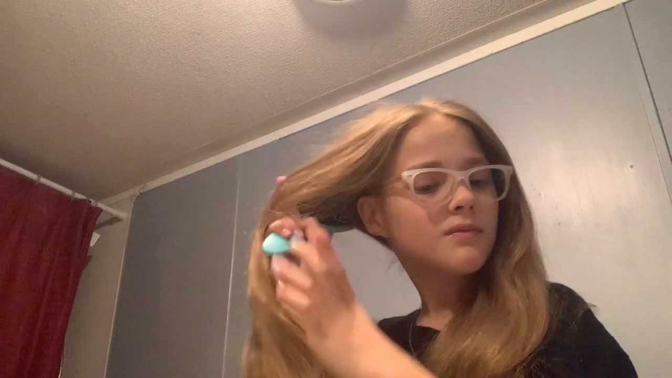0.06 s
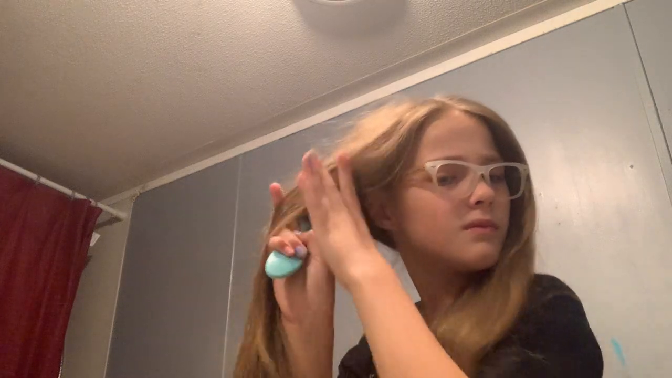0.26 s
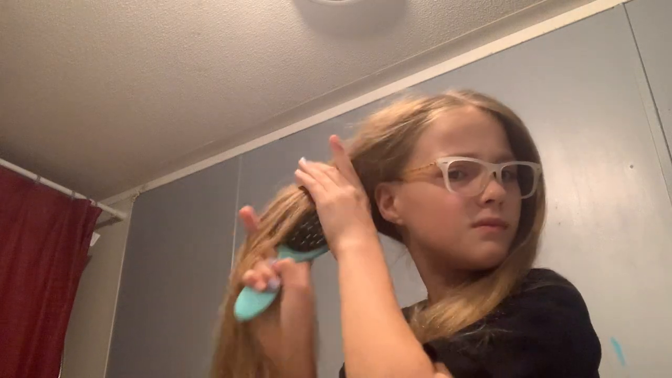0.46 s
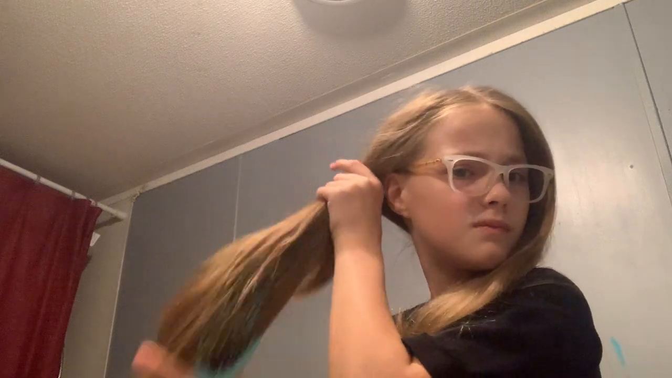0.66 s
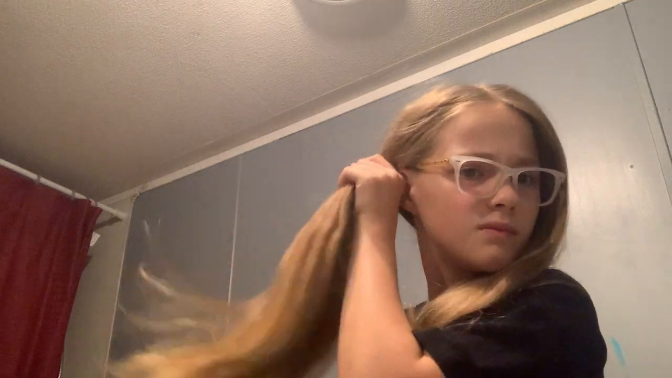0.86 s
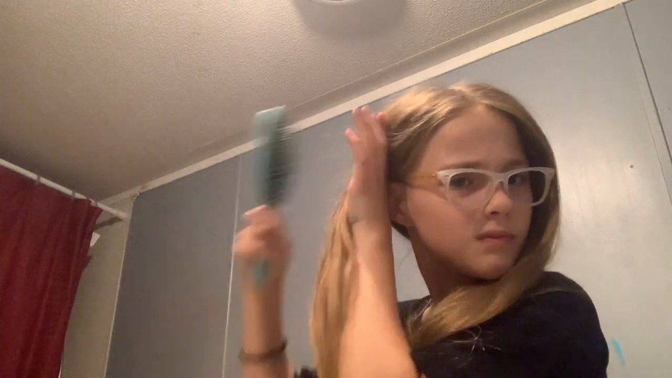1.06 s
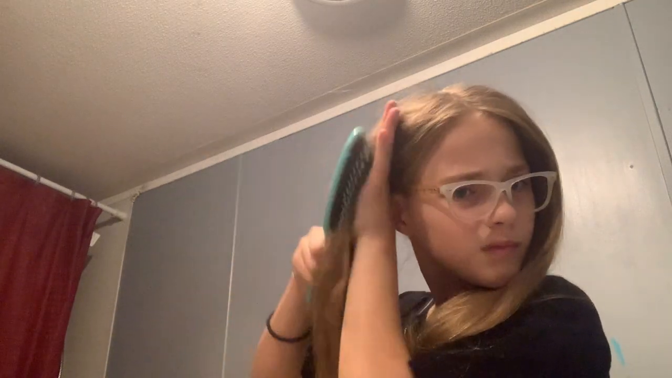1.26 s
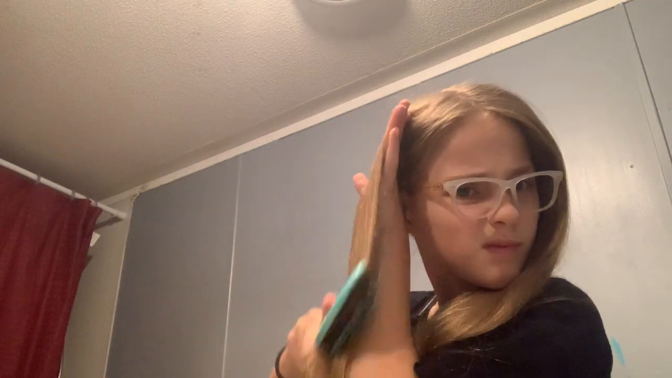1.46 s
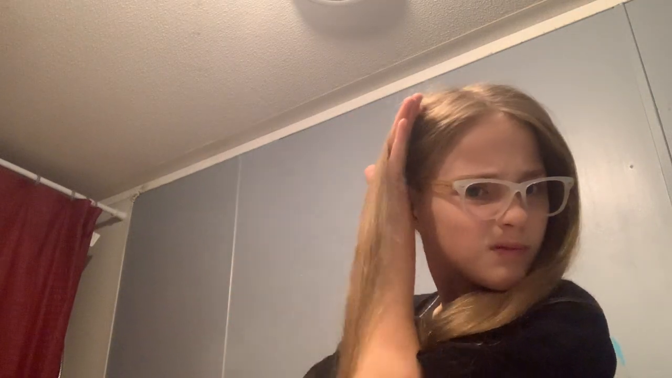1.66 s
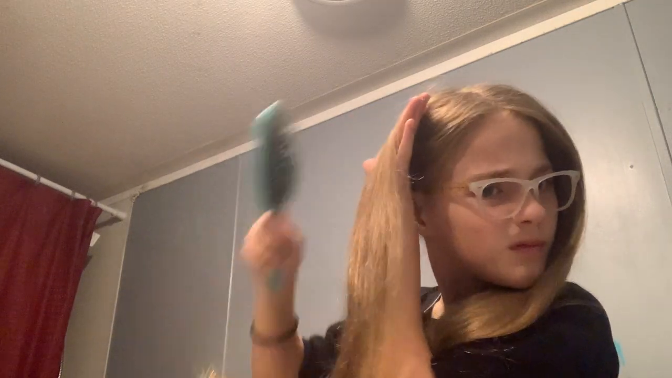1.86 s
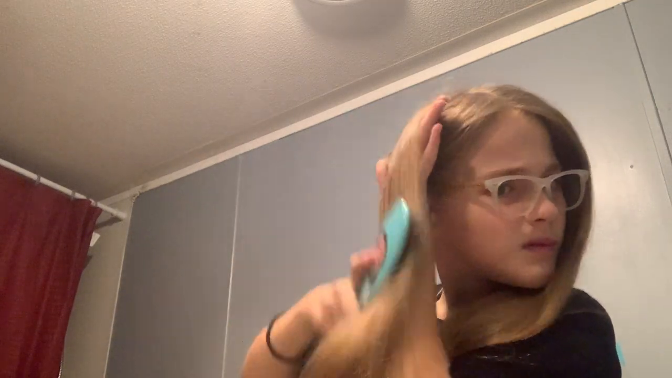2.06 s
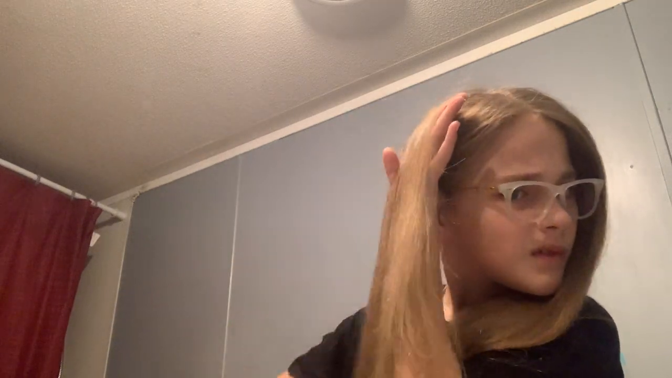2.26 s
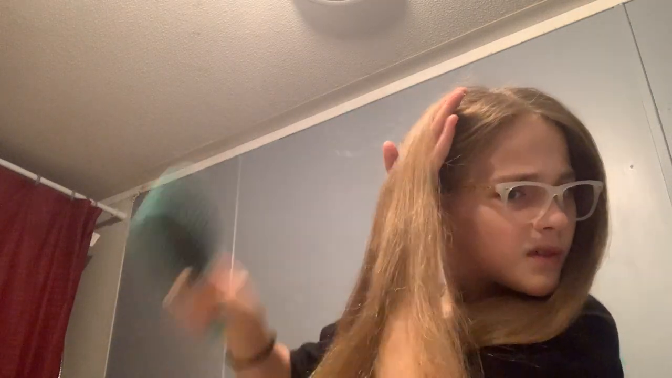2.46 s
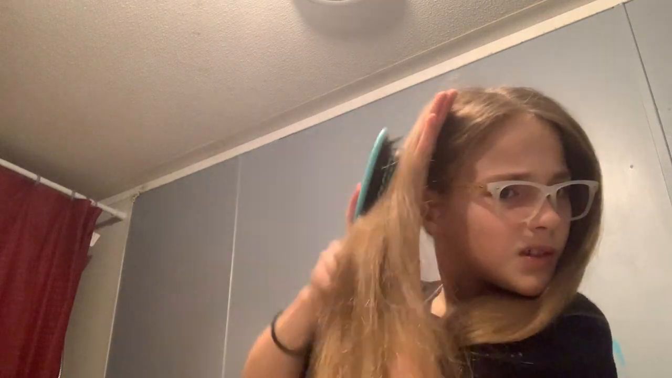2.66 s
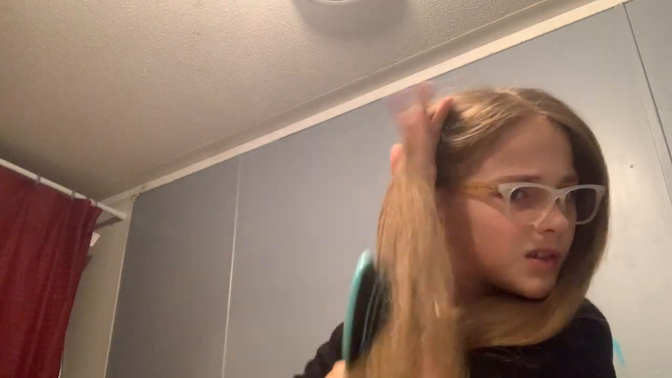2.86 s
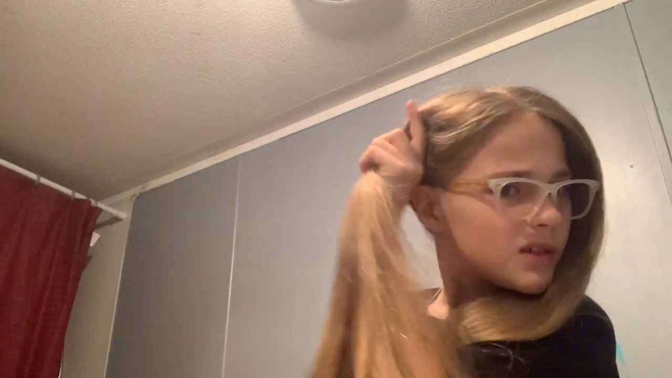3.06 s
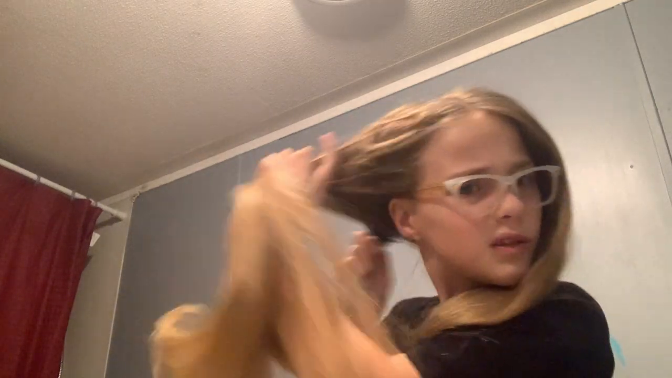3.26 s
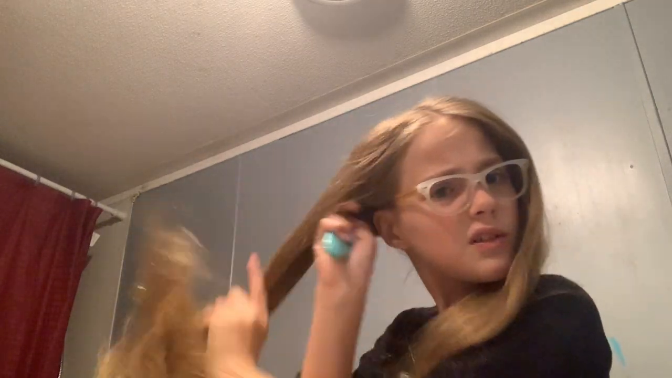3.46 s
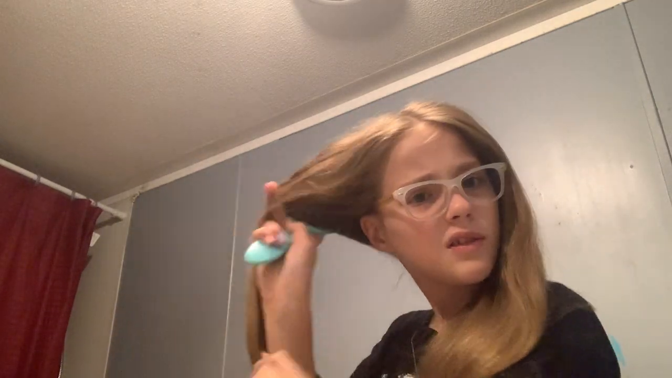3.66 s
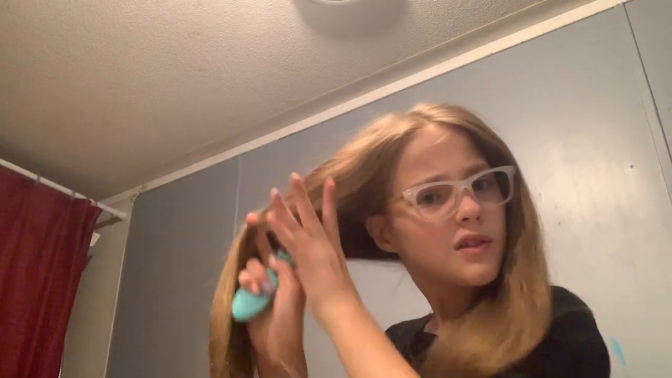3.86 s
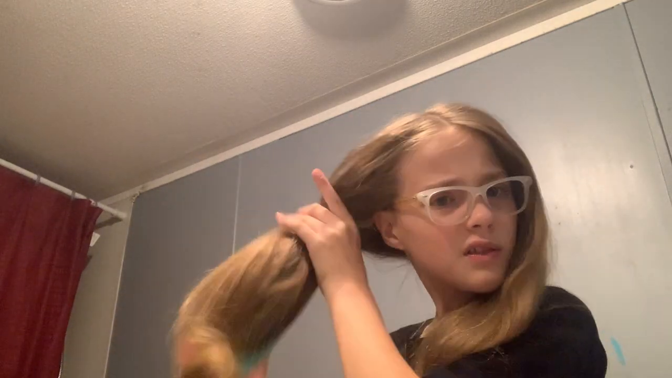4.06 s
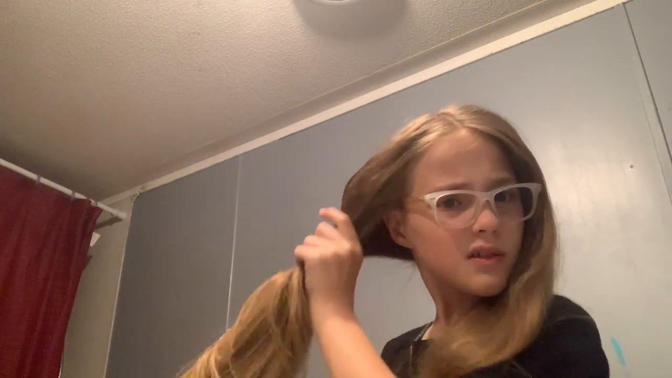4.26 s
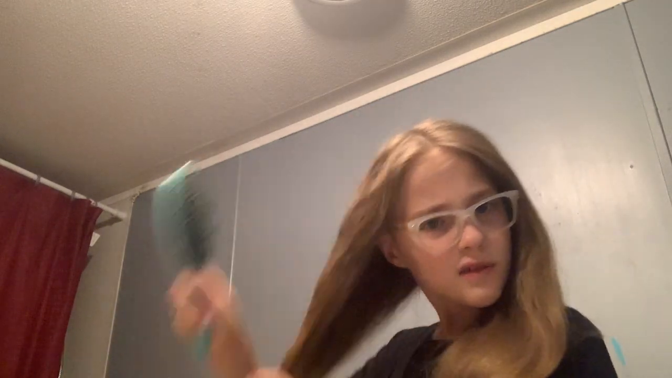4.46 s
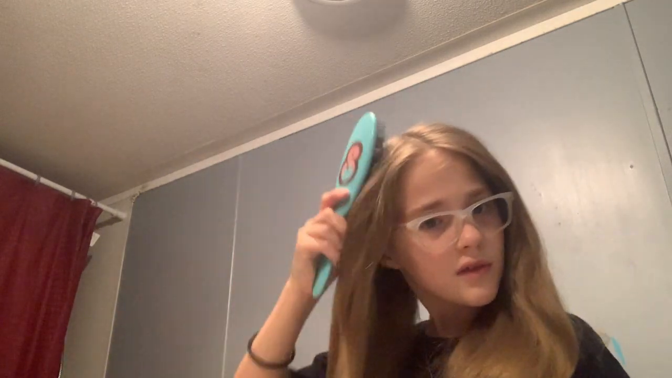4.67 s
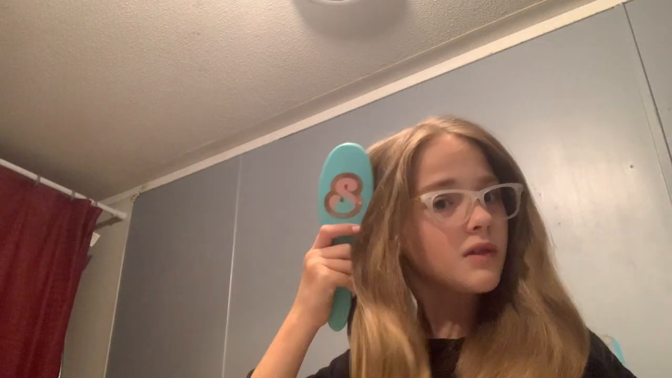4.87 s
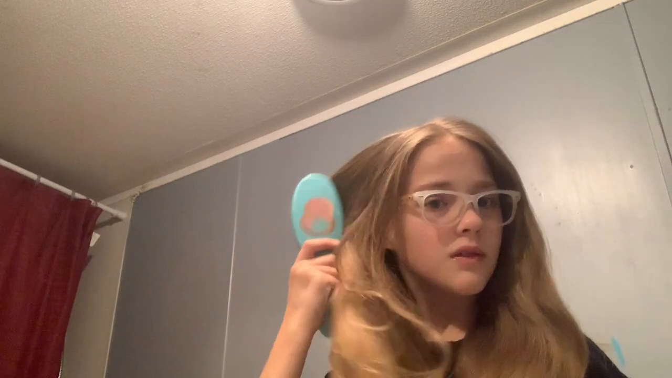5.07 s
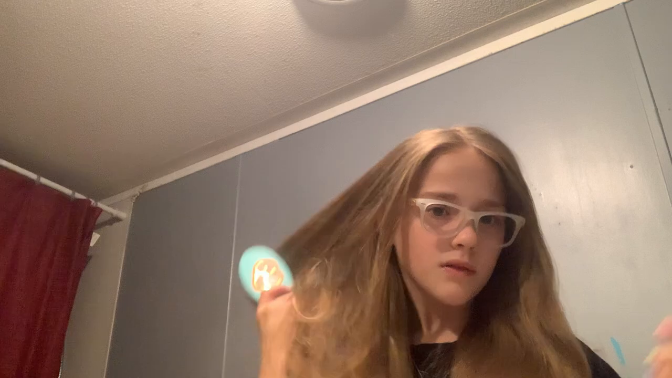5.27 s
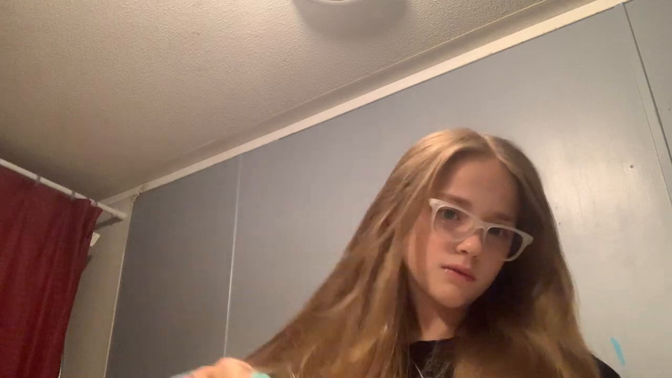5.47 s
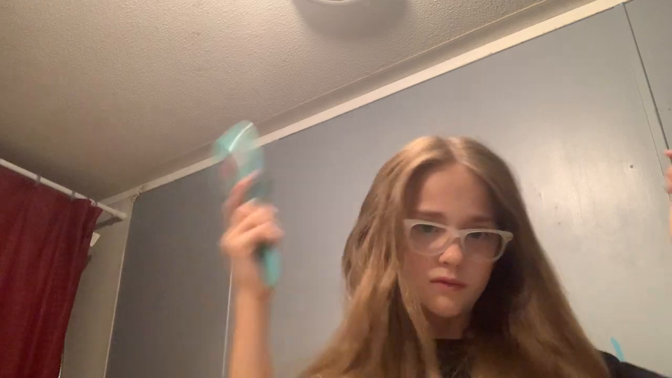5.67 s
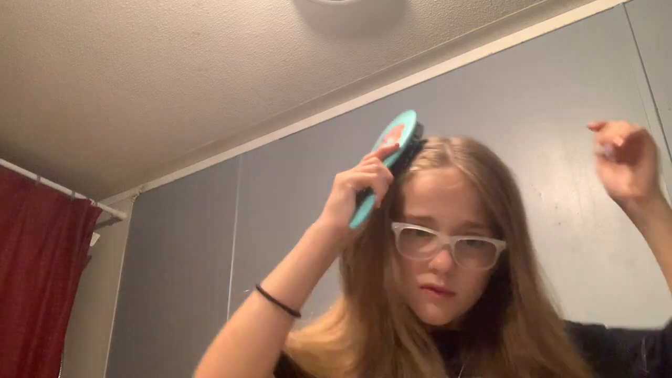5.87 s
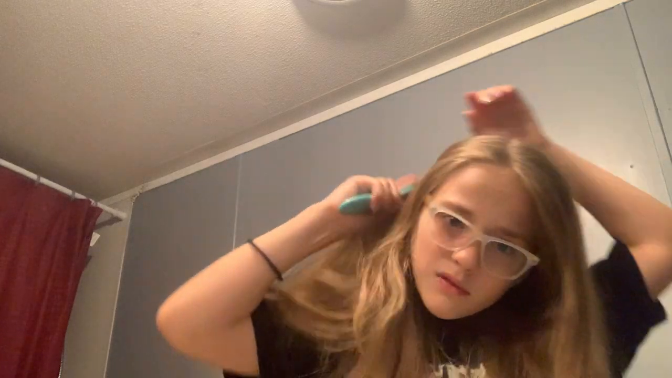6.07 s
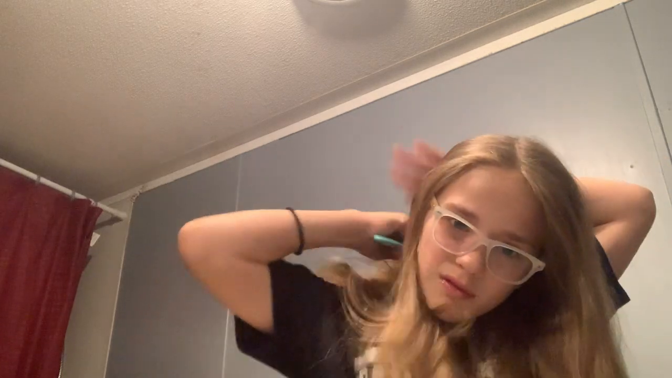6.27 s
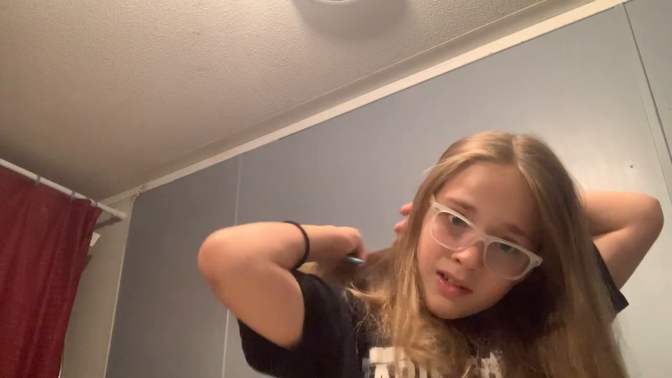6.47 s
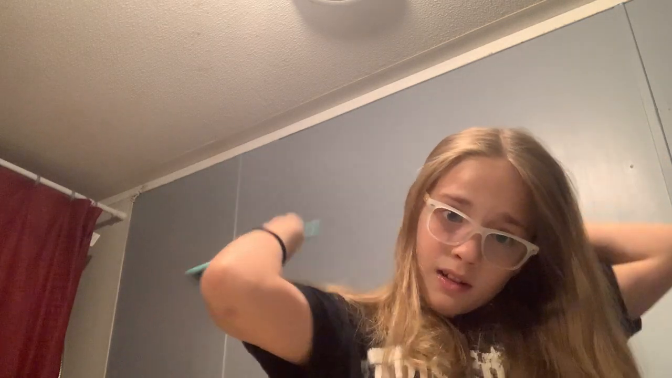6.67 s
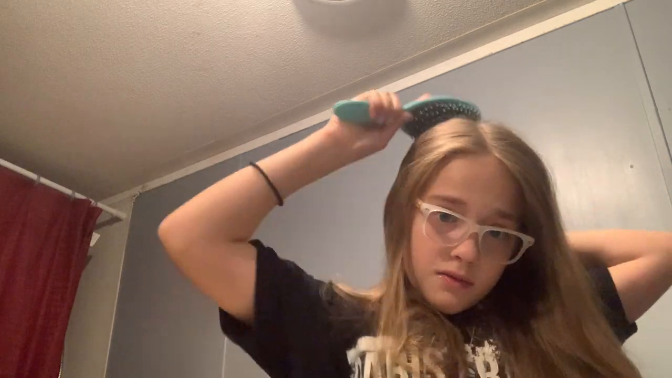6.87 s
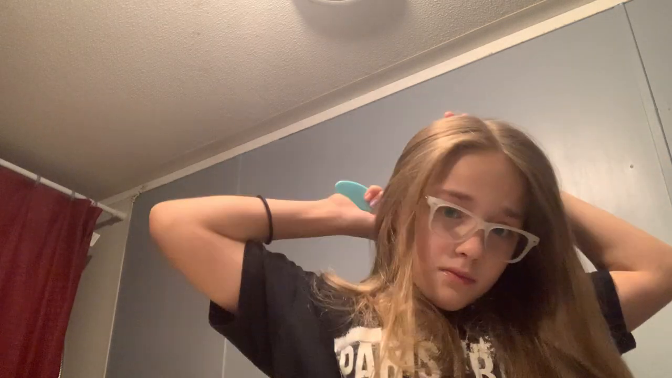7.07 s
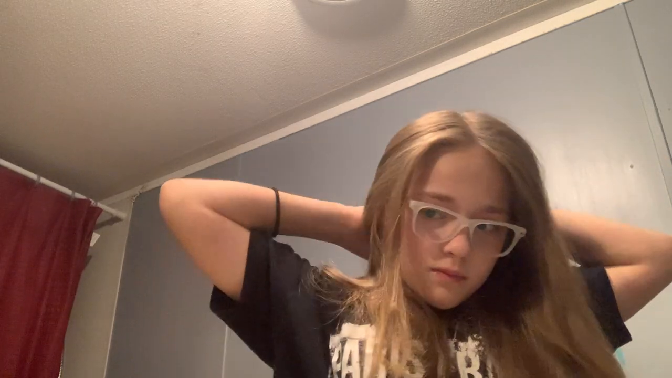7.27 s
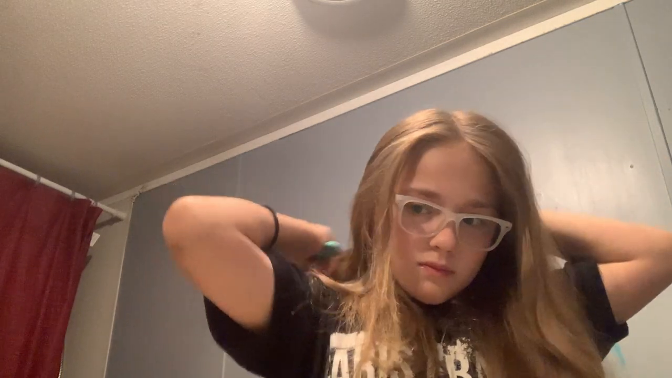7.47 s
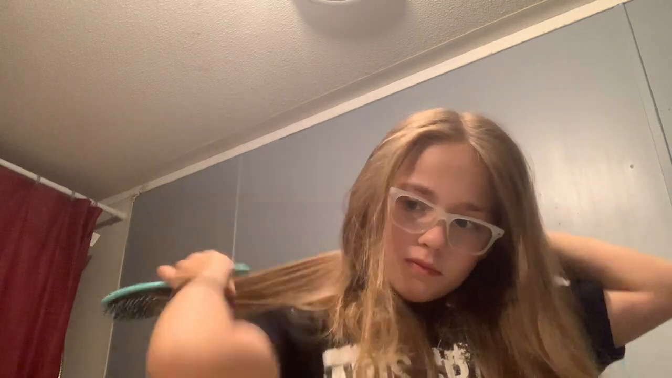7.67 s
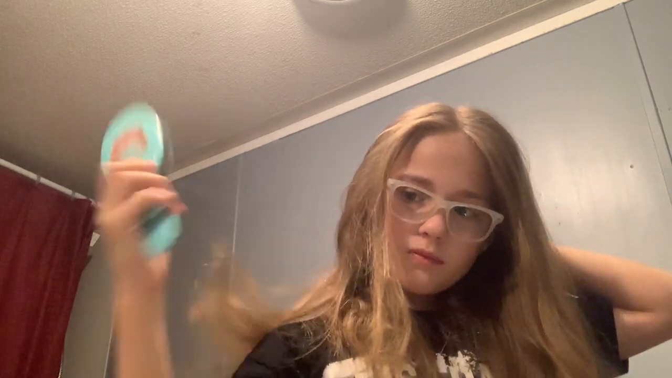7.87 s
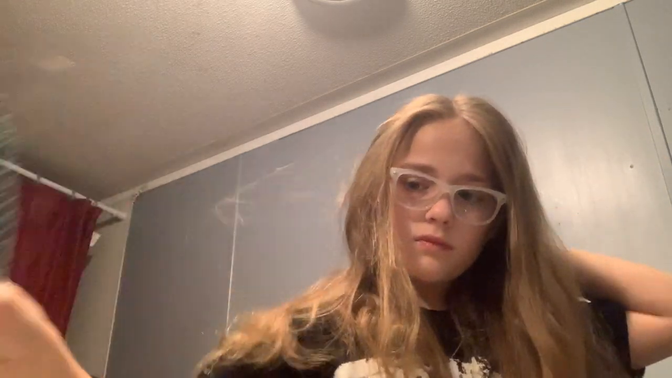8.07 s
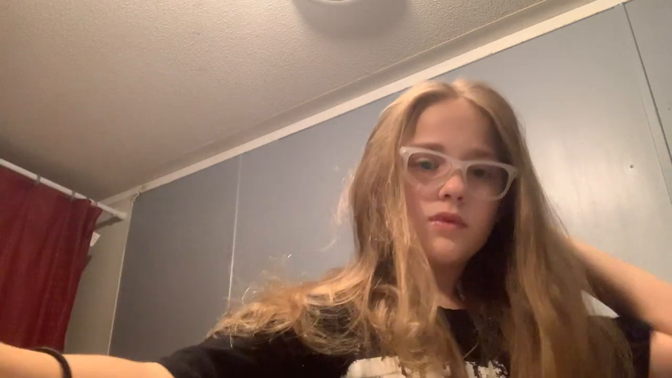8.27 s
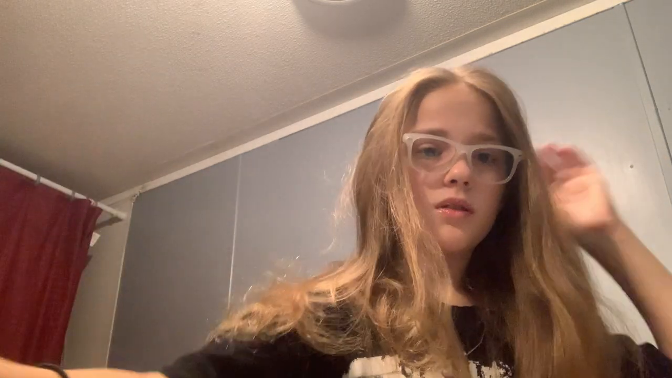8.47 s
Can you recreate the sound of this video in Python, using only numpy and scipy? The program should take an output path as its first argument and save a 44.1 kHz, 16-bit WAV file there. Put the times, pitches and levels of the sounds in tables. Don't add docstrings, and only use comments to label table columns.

```python
import sys
import numpy as np
from scipy import signal
from scipy.fft import rfft, irfft, next_fast_len
from scipy.io import wavfile
from scipy.ndimage import uniform_filter1d, map_coordinates

SR = 44100
rng = np.random.default_rng(int(sys.argv[2]) if len(sys.argv) > 2 else 0)


def store_pcm(level_fs):
    pcm = np.round(np.clip(level_fs, -1, 1) * 32767).astype(np.int16)
    wavfile.write(sys.argv[1], SR, np.atleast_2d(pcm).T)


def linear_from_db(decibels):
    return 10 ** (np.asarray(decibels, float) / 20)


N = 375732


# frequency in Hz, level in dB.
HISS_COLOUR = [(4000, -97), (6000, -20), (7200, -2.5), (9700, 4.5), (11000, 2), (12500, 4), (15000, 5),
               (15800, -3)]
SWISH_COLOUR = [(1500, -92), (2500, -8.5), (3400, 4.5), (5000, 0), (6600, -4), (8000, -15), (11000, -90)]
RASP_COLOUR = [(600, -98), (1100, -25.5), (1500, 9.5), (2400, 6), (3200, -8), (4000, -31), (7000, -93)]
BODY_COLOUR = [(350, -89), (600, -13), (780, 2.5), (950, -0.5), (1250, 0.5), (1600, -38), (3000, -91)]


def brush():
    power = strokes()
    add_snags(power)
    add_bumps(power)
    flutter_db = 0.27 * wobble(14) + 0.66 * wobble(45)
    hairs = slips(spread_db=3.0, patchy_db=1.5) * linear_from_db(flutter_db)
    colours = (HISS_COLOUR, SWISH_COLOUR, RASP_COLOUR, BODY_COLOUR)
    layers = [coloured(hairs, colour) for colour in colours]
    return np.sum(np.sqrt(power) * layers, axis=0)


# start in seconds, swell in seconds,
# hold in seconds, speed as hiss level in dB, pressure on the scalp in dB.
STROKES = [(0.469, 0.11, .26, -54.5, -6), (1.252, .03, 0.27, -59, -4), (1.396, 0.022, 0.24, -59.5, -2),
           (2.059, .03, .05, -60, -0.5), (2.12, 0.11, .11, -61, 2), (2.44, 0.098, 0.13, -64.5, -0.5),
           (2.783, .015, .09, -59.5, 3.5), (2.88, .08, 0.096, -61, -0.5), (3.31, 0.023, 0.037, -67, -1.5),
           (3.46, 0.063, 0.21, -65.5, -3.5), (3.94, .14, 0.21, -58, -6), (4.736, .04, 0.024, -59, -2.5),
           (4.846, .11, .47, -65, -1), (5.885, .03, .06, -59.5, -1.5), (5.968, 0.085, 0.13, -57.5, -2.5),
           (6.25, .15, 0.21, -67, 2), (6.876, 0.023, 0.016, -67, 4.5), (6.965, 0.074, 0.032, -63, 3),
           (7.327, 0.1, 0.25, -69, -1)]
GRAZES = [(0.0, 0.016, 0.44, -69, -3.5), (1.172, .04, 0.086, -71.5, 3.5), (1.99, .02, .08, -68, 3),
          (2.36, .03, 0.13, -74, 4), (2.668, 0.015, .04, -78, 9), (3.38, .03, 0.11, -77, 6.5),
          (3.745, 0.036, 0.39, -70, -6.5), (4.45, .1, 0.2, -81.5, 11), (4.82, .02, 0.13, -73.5, 0),
          (6.2, .03, .14, -70.5, 0), (7.148, .06, .06, -73.5, 3), (7.95, 0.078, 0.11, -82, 3)]
# level over the stroke in dB,
# dB gained per dB of pressure, and level of loose hair and cloth between strokes in dB.
LAYER_DB = [1.5, 0, -1, 5.5]
PRESSURE_GAIN = [0, 1, 1, 1]
REST_DB = [-87.5, -82, -62, -65.5]


def strokes():
    swell_db, lift_db_per_s = 14, 263
    t = np.arange(N) / SR
    power = linear_from_db(REST_DB)[:, None] ** 2 * np.ones(N)
    for s, swell, hold, speed_db, press_db in STROKES + GRAZES:
        span = slice(round(s * SR), round((s + swell + hold) * SR) + SR // 4)
        since = t[span] - s - swell
        rise_db = swell_db * since / max(swell, .005)
        fall_db = lift_db_per_s * (hold - since)
        shape_db = np.minimum(0, np.minimum(rise_db, fall_db))
        layer_db = speed_db + np.array(LAYER_DB) + press_db * np.array(PRESSURE_GAIN)
        power[:, span] += linear_from_db(layer_db[:, None] + shape_db) ** 2
    return power


# start in seconds, peak in dB, treble in dB, t60 in seconds.
SNAGS = [(0.8194, -49.5, -2.5, 0.042), (1.1964, -52.5, -6, 0.045), (1.2844, -47, 1, 0.041),
         (1.459, -40, -4.5, 0.065), (1.543, -49.5, -4, .03), (1.624, -44, -6, 0.027),
         (1.5994, -50.5, -4.5, 0.046), (1.9993, -48, -2, 0.041), (2.0796, -45, -0.5, 0.043),
         (2.6458, -40.5, -3.5, 0.049), (2.7997, -43.5, -18.5, 0.041), (2.8594, -43.5, 0.5, 0.039),
         (3.3303, -42.5, 1, 0.035), (3.3594, -56, -9, 0.031), (3.5337, -55, 0.5, 0.049),
         (3.649, -50, -2, 0.029), (3.9878, -43.5, -16.5, 0.03), (4.296, -35.5, -1, 0.024),
         (4.6704, -51.5, 0.5, 0.041), (4.7632, -44, 2, 0.057), (4.9594, -52.5, 5, 0.066),
         (5.8898, -58.5, -1, 0.027), (5.929, -50.5, 0, 0.061), (6.859, -56, -4, 0.027),
         (6.896, -45.5, 11, 0.03), (7.04, -40.5, -10.5, 0.032), (7.7133, -48, -11, 0.035),
         (8.003, -46, -28, 0.04)]


def add_snags(power):
    t = np.arange(SR // 8) / SR
    for s, db, treble_db, t60 in SNAGS:
        burst = linear_from_db(-60 * t / max(t60, .01)) * (1 - np.exp(-t / .0007))
        peaks = linear_from_db([[db + treble_db - 2.5], [db - 7.5], [db - 7.0]])
        power[:3, round(s * SR):][:, :len(t)] += (peaks * burst) ** 2


# start in seconds, peak in dB, note in Hz, t60 in seconds.
BUMPS = [(0.812, -35.5, 843, 0.078), (1.462, -35, 900, 0.038), (1.596, -31.5, 1030, 0.055),
         (1.997, -37.5, 762, 0.092), (2.073, -34.5, 820, 0.064), (2.32, -40, 791, 0.081),
         (2.649, -38.5, 817, 0.093), (2.809, -36.5, 904, 0.07), (3.986, -38.5, 997, 0.041),
         (7.713, -33.5, 778, 0.11), (1.463, -35.5, 2364, .03), (3.989, -43, 3000, 0.023),
         (8.0, -45.5, 3050, .03)]


def add_bumps(power):
    rattle_db, rattle_t60 = -8, .12
    clack_db, clack_t60 = np.array([[-20.5], [-14]]), 0.027
    t = np.arange(SR // 8) / SR
    for s, db, *_ in BUMPS:
        start = round(s * SR)
        power[3, start:][:len(t)] += linear_from_db(db + rattle_db - 60 * t / rattle_t60) ** 2
        power[1:3, start:][:, :len(t)] += linear_from_db(db + clack_db - 60 * t / clack_t60) ** 2


def bumps():
    out, t = np.zeros(N + SR), np.arange(SR // 4) / SR
    for s, db, hz, t60 in BUMPS:
        decay = linear_from_db(db - 1.0 - 60 * t / max(t60, .02))
        attack = 1 - np.exp(-t / 0.0018)
        out[round(s * SR):][:len(t)] += decay * np.sin(2 * np.pi * hz * t) * attack
    return out[:N]


def slips(spread_db, patchy_db):
    grains = rng.standard_normal(N) * linear_from_db(spread_db * rng.standard_normal(N))
    z = signal.stft(grains, nperseg=256)[2]
    field = uniform_filter1d(rng.standard_normal(z.shape), size=7, axis=0)
    field = uniform_filter1d(field, size=50, axis=1)
    return signal.istft(z * linear_from_db(patchy_db * unit(field)), nperseg=256)[1][:N]


# time in seconds, centre frequency in Hz, level in dB.
SLEEVE = [
    (6.34, 3520, -81),
    (6.42, 3550, -58),
    (6.55, 3780, -64.5),
    (6.68, 4080, -63.5),
    (6.8, 4230, -72),
    (6.9, 4200, -120),
]


def sleeve():
    hz, db = curves(SLEEVE)
    return linear_from_db(db) * unit(wobble(420)) * np.sin(2 * np.pi * np.cumsum(hz) / SR)


# start in seconds, crack in dB, crack t60 in seconds,
# counter ring in dB, paddle ring in dB.
KNOCKS = [
    (8.2774, -16.5, 0.042, -26, -23.5),
    (8.282, -8.5, 0.034, -15.5, -26.5),
    (8.2857, -21, 0.19, -8, -38),
    (8.325, -20, 0.083, -16, -37),
    (8.374, -30, 0.088, -37.5, -48),
    (8.3818, -6.5, 0.052, -9.5, -20),
    (8.387, -14.5, 0.043, -30.5, -17),
    (8.402, -18.5, 0.028, -41, -38),
    (8.443, -28, 0.044, -32, -39.5),
]
# time in seconds, level in dB.
SLIDE = [
    (8.36, -73.5),
    (8.38, -40.5),
    (8.45, -54.5),
    (8.48, -34),
    (8.5, -35.5),
    (8.52, -39),
]
# frequency in Hz, level in dB, t60 in seconds.
COUNTER_MODES = [(91, -13, 0.092), (187, -11.5, 0.085), (276, -13.5, 0.083), (330, -10, 0.08),
                 (404, -12, 0.076), (497, -5, 0.082), (565, -11, 0.091), (648, -1, 0.19), (830, -7, 0.062),
                 (1180, -10.5, 0.079)]
PADDLE_MODES = [(388, 8, 0.027), (825, -8, .06), (1450, -6, 0.051), (1960, -3, 0.046), (2380, -14.5, 0.042),
                (3160, -3.5, 0.023), (5300, -15, .015)]
# frequency in Hz, level in dB.
CRACK_COLOUR = [(200, -14), (600, 10.5), (1500, 4), (3000, 3), (6500, -5.5), (8300, -4.5), (11500, -2),
                (15800, -7.5)]
SKID_COLOUR = [(500, -16), (4000, -7.5), (7000, -3), (9500, 8), (12500, 3.5), (15800, -8)]


def knocks():
    cracks, rings = np.zeros(N + SR), np.zeros(N + SR)
    t = np.arange(SR // 4) / SR
    attack = 1 - np.exp(-t / 0.0018)
    for s, crack_db, t60, counter_db, paddle_db in KNOCKS:
        start = round(s * SR)
        decay = linear_from_db(crack_db - 60 * t / max(t60, .005))
        cracks[start:][:len(t)] += decay * rng.standard_normal(len(t))
        modes = linear_from_db(counter_db) * ring(COUNTER_MODES, t) + linear_from_db(paddle_db) * ring(PADDLE_MODES, t)
        rings[start:][:len(t)] += modes * attack
    skid = linear_from_db(curves(SLIDE)[0]) * coloured(slips(spread_db=3, patchy_db=1.5), SKID_COLOUR)
    return filtered(cracks[:N], lambda hz: linear_from_db(along(CRACK_COLOUR, hz))) + rings[:N] + skid


def ring(modes, t):
    out = np.zeros(len(t))
    for hz, db, t60 in modes:
        decay = linear_from_db(db + rng.normal(0, 1.5) - 60 * t / t60)
        out += decay * np.sin(2 * np.pi * (hz * t + rng.random()))
    return out


# frequency in Hz, t60 in seconds.
WALLS = [(200, 0.29), (700, 0.23), (2000, 0.21), (6000, 0.23), (12000, 0.13)]
# frequency in Hz, left-right likeness.
ALIKE_NEAR = [(120, 0.69), (300, 0.28), (6200, 0.056), (7600, 0.96), (12000, 0.86), (13000, .99),
              (15000, .85)]
# frequency in Hz, left over right in dB.
TILT = [(200, 2), (400, 7), (800, 8), (1170, -2), (1800, 3), (3000, 2), (6000, 0)]


def room(x, wet_db, drift):
    hz, t, z = signal.stft(rng.standard_normal((2, SR // 2)), SR, nperseg=256)
    decay = linear_from_db(-60 * t / along(WALLS, hz)[:, None])
    tail = signal.istft(z * decay, SR, nperseg=256)[1]
    tail = np.pad(tail / np.linalg.norm(tail[0]), ((0, 0), (150, 0)))
    tail = linear_from_db(wet_db) * tail
    tail[:, 0] = 1
    pair = np.array([x, scattered(x, drift)])
    heard = ports(signal.oaconvolve(pair, tail, axes=1)[:, :N], ALIKE_NEAR)
    return filtered(heard, lambda hz: linear_from_db(along(TILT, hz) * np.array([[.5], [-.5]])))


def scattered(x, drift):
    z = signal.stft(x, nperseg=128)[2]
    wander = drift * np.cumsum(rng.standard_normal(z.shape), axis=1)
    phase = 2 * np.pi * rng.random((len(z), 1)) + wander
    out = signal.istft(z * np.exp(1j * phase), nperseg=128)[1][:N]
    return unit(out) * np.std(x)


# frequency in Hz, phase in radians.
TURN = [(280, 0), (620, -.5), (680, -3.1), (750, -3.1), (800, -5.2), (1200, -5.3), (1600, -5.8),
        (2500, -6.9), (6200, -5.5), (7400, -3.3), (8800, -3.1), (12000, -.1), (12900, 0), (15800, 2.9)]


def ports(pair, likeness):
    def mix(hz):
        alike = np.clip(along(likeness, hz), 0, 1)
        return [alike * np.exp(1j * along(TURN, hz)), np.sqrt(1 - alike ** 2)]
    return np.array([pair[0], filtered(pair, mix).sum(axis=0)])


# frequency in Hz, width in Hz, left level in dB, right level in dB.
ROOM_MODES = [(33, 2.6, -63, -65), (72.7, 8.9, -51, -52), (95.7, 25.5, -48.5, -51), (159.7, 32.8, -54, -55),
              (206, 5.3, -57, -62), (241.2, 25.4, -61.5, -62), (286.5, 24.6, -67, -60.5),
              (323, 11, -79.5, -67), (368, 16, -76.5, -83), (404.4, 36, -60, -72),
              (466.2, 16.6, -60, -66.5), (508.2, 48, -65.5, -65), (556.7, 9.9, -59.5, -73),
              (596.5, 31.5, -64, -69.5), (653.4, 33, -68, -76), (724, 17, -70, -76), (855, 33, -101, -85.5),
              (1110, 24, -93, -74.5), (1162.4, 19.3, -74.5, -72.5), (1230, 19, -84.5, -78.5)]
# frequency in Hz, level in dB per Hz.
AIRFLOW = [(300, -101), (700, -79.5), (1000, -88), (1400, -90), (1700, -90.5), (2100, -96.5), (2800, -100),
           (3600, -100), (4500, -103), (6500, -111.5), (7300, -117), (10000, -121), (15800, -124)]
# frequency in Hz, left level in dB, right level in dB, drift in Hz.
MOTOR = [(120, -34, -36.5, 0.015), (239.8, -56.5, -58, 0.23), (615, -49.5, -66.5, 0.673)]
# frequency in Hz, left-right likeness.
ALIKE_FAR = [(280, 1), (600, 1), (780, 0.29), (1600, 0.41), (3300, 0.17), (6200, 0.092), (7600, 0.34),
             (9000, 1), (10300, 0.71), (12000, 0.78), (13000, .99), (15000, 0.3)]


def fan():
    air = ports(rng.standard_normal((2, N)), ALIKE_FAR) * np.sqrt(SR / 2)
    grid = np.arange(1, SR // 2, 2)
    power = linear_from_db(along(AIRFLOW, grid)) ** 2
    for centre, width, left, right in ROOM_MODES:
        detuning = (grid * grid - centre * centre) / (grid * width)
        power = power + linear_from_db([[left], [right]]) ** 2 / (1 + detuning ** 2) ** 1.64
    gains = np.sqrt(power)
    tones = np.zeros((2, N))
    for hz, left, right, drift in MOTOR:
        cycles = np.cumsum(hz + drift * wobble(1.465)) / SR
        tones += linear_from_db([[left], [right]]) * np.sqrt(2) * np.sin(2 * np.pi * cycles)
    return filtered(air, lambda hz: [np.interp(hz, grid, g) for g in gains]) + tones


def unit(x):
    return x / np.sqrt(np.mean(x ** 2) + 1e-20)


def along(points, hz):
    f, v = np.transpose(points)
    return np.interp(np.log(hz + 1), np.log(f + 1), v)


def curves(rows):
    s, *cols = np.transpose(rows)
    return [np.interp(np.arange(N) / SR, s, c, left=-120) for c in cols]


def wobble(rate):
    knots = rng.standard_normal(int(N * rate / SR) + 4)
    return map_coordinates(knots, [np.arange(N) * rate / SR])


def filtered(x, response):
    m = next_fast_len(N + SR // 2)
    return irfft(rfft(x, m) * response(np.fft.rfftfreq(m, 1 / SR)), m)[..., :N]


def coloured(x, spectrum):
    return unit(filtered(x, lambda hz: linear_from_db(along(spectrum, hz))))


def scene():
    brushing = room(brush() + bumps() + sleeve(), wet_db=-5.0, drift=0.451)
    knocking = room(knocks(), wet_db=-3.0, drift=0.1524)
    return brushing + knocking + fan()


def low_pass(x):
    return signal.sosfilt(signal.butter(12, 16310, fs=SR, output="sos"), x)


def record(dry):
    ceiling, top_hz = 1.05, 15800
    held = dry / (1 + np.abs(dry / ceiling) ** 4) ** (1 / 4)
    return low_pass(filtered(held, lambda hz: hz < top_hz))


dry = scene()
out = record(dry)
store_pcm(out)
```